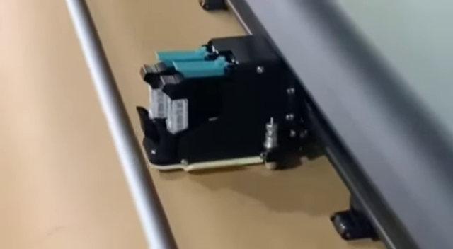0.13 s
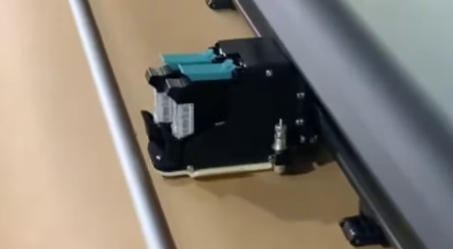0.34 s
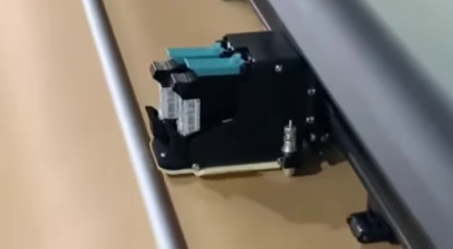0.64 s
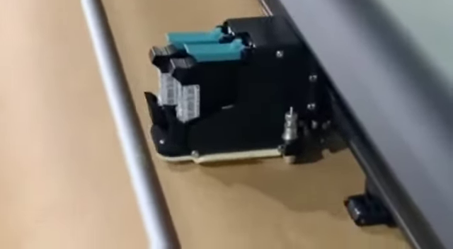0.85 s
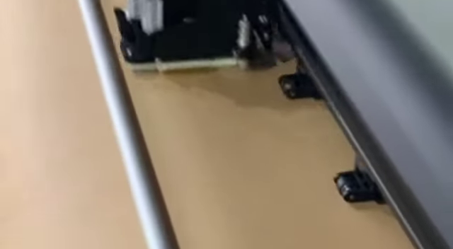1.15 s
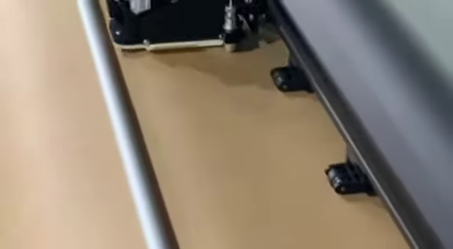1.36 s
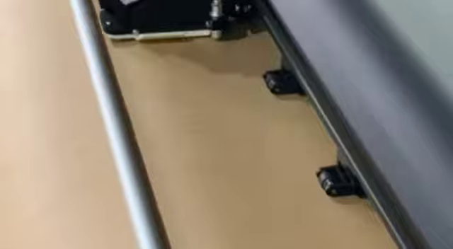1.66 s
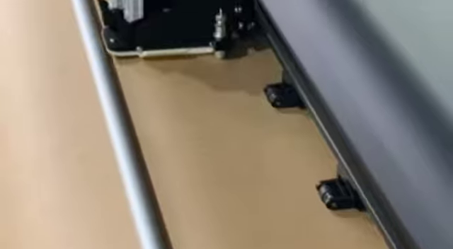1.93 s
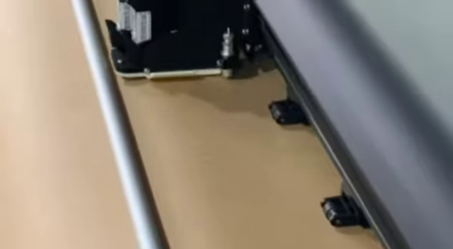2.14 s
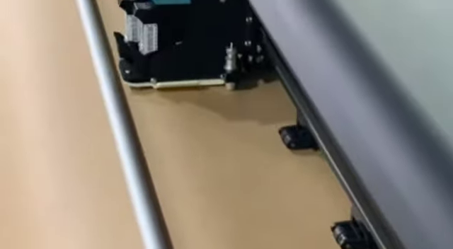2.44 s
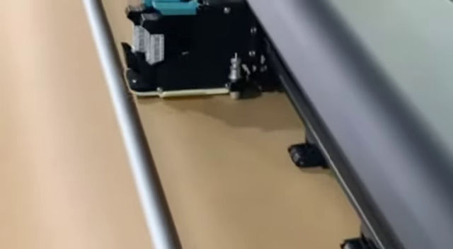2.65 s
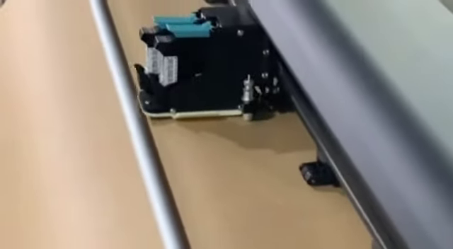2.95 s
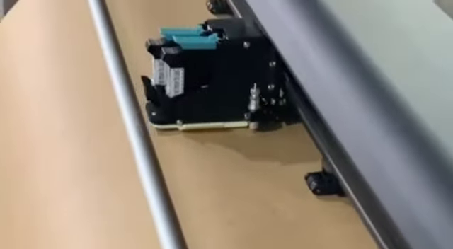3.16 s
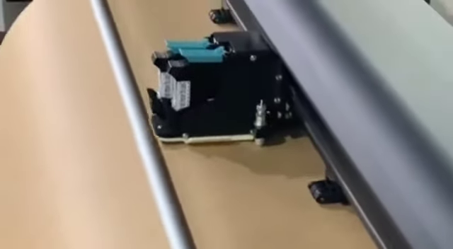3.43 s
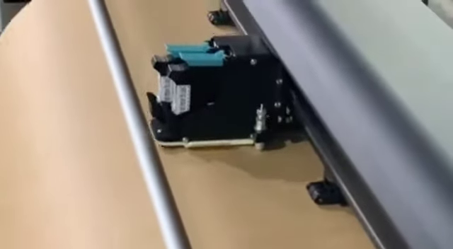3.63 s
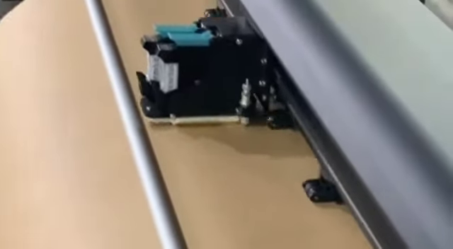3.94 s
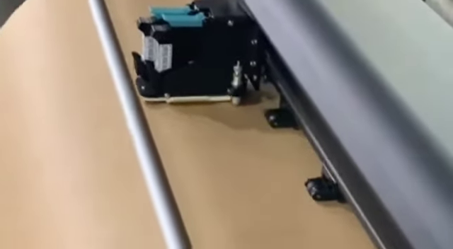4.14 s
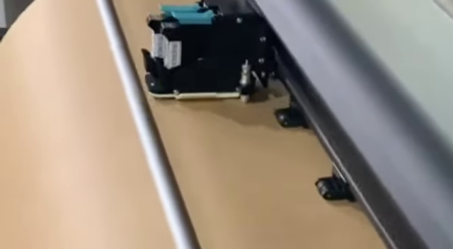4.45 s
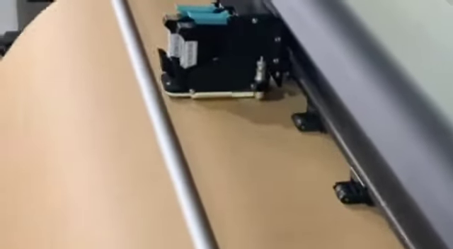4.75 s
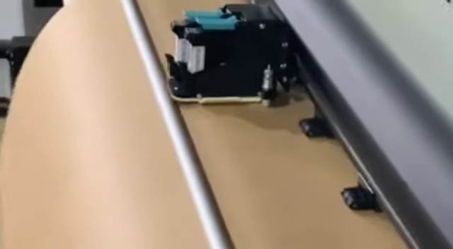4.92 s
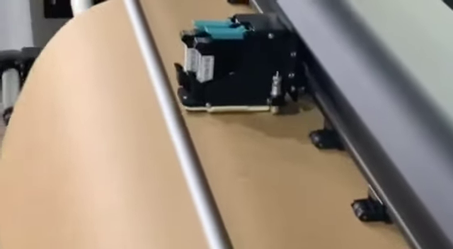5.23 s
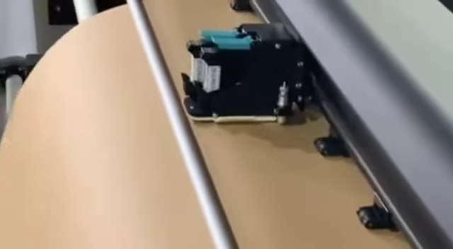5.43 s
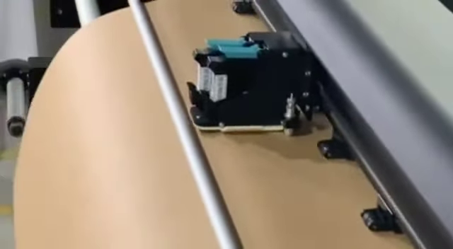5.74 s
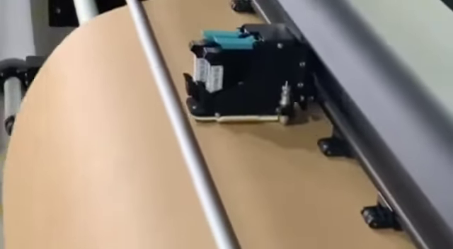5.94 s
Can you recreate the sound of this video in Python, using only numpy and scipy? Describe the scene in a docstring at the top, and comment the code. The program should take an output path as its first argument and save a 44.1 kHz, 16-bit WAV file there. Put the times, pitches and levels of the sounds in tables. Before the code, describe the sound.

Quick mechanical strokes: gears glide up to a nasal, singing pitch and fall again, with airy friction and rasping bearings. Some strokes are higher and faster, others low and nearly whineless. Paper rustles mostly to the left, the frame thuds dully, and tiny bright ticks and thin whistling mark the pen. Close stereo pickup, with room ring and a steady fan rumble behind.

```python
"""A gear whine arches up and down in pitch, close to the microphone: a large plotter at work in a workshop.
In each stroke the servo speeds up and brakes, and the carriage hisses, rumbles and clacks along its rail.
The sheet rustles, snaps and brushes the machine; the pen coil whistles faintly while the pen is down, and the
pen ticks. Behind them a low rumble swells, the frame thuds, and a suction fan hums in a rush of air."""
import sys
import numpy as np
from scipy import signal
from scipy.fft import rfft, irfft, next_fast_len
from scipy.io import wavfile
from scipy.ndimage import map_coordinates

SR = 44100
rng = np.random.default_rng(int(sys.argv[2]) if len(sys.argv) > 2 else 0)


def file_out(sig):
    """Save sig as 16-bit WAV at sys.argv[1]."""
    # one column per channel
    cols = np.atleast_2d(sig).T
    # limit, then scale
    lim = np.clip(cols, -1, 1)
    pcm = np.round(lim * 32767).astype(np.int16)
    wavfile.write(sys.argv[1], SR, pcm)


N = 268375
T = np.arange(N) / SR  # s

# Levels in the tables are in dB; most sources add a gain of their own.
# Carriage strokes, slow for detail, near 1000 Hz for long lines, fastest with the pen lifted:
# middle_s, length_s, top_mesh_pitch_hz, rolling_db, whine_db, hiss_db
CARRIAGE_STROKES = [(0.088, 0.25, 989.5, 2, -1.5, 0), (.397, 0.21, 1294, -2, -2, 0.7),
                    (0.756, 0.28, 1012, 2.5, -2, 0.5), (1.133, 0.29, 1415, 0.5, -2.5, 1),
                    (1.484, 0.19, 380, -3, -37, -3), (1.674, 0.18, 360, -4.5, -30, -3),
                    (1.993, 0.2, 470, -2, -34, -4), (2.241, 0.22, 509.6, -0.5, -7, -3.5),
                    (2.625, .24, 400, -8, -37, -4), (2.959, 0.25, 982.6, 2, -1.5, 0),
                    (3.269, .2, 1297, -2.5, -2.5, 0), (3.625, 0.25, 1024, 2, -4, -2),
                    (3.977, 0.25, 1000, 1, -1.5, -1), (4.373, 0.24, 984, 2, -2, 0.5),
                    (4.685, 0.21, 1298, 1, -2, 0), (5.043, 0.26, 1027, 2, -0.5, 0),
                    (5.354, 0.22, 1298, 1.5, -1.5, 0), (5.696, .21, 350.8, -0.5, -32, -3.5),
                    (5.954, 0.19, 842, 0, -2.5, 0)]
CRUISE = 1.02  # peak of the speed parabola, which is held at 1
LINE_HZ = 1000  # mesh pitch at carriage speed 1
GLIDE_SPREAD = 0.4  # half width of the carriage's noise, as a share of the stroke
# Gear partials; the weaker ones beside the mesh pitch come from the shaft's once-a-turn wobble:
# multiple_of_mesh_pitch, level_db
GEAR_PARTIALS = [(1, 0), (.78, -19), (.92, -15), (2, -17)]
# How well the housing radiates the whine: frequency_hz, gain_db
HOUSING_RESPONSE = [(200, -24), (450, -8), (620, -3), (720, -2), (800, 1.5), (870, -1), (950, 0),
                    (1020, -1.5), (1110, -4), (1250, -1), (1330, -2.5), (1450, -6), (2000, -3), (3000, -8)]
# Echoes of the whine off machine and walls: delay_s, gain_db
ECHO_PATHS = [(.013, -14), (.029, -13), (.056, -8.5), (.104, -10.5)]
# Panel modes that ring on when the whine lingers at their pitch: pitch_hz, gain_db, t60_s
PANEL_MODES = [(945, -2, .6), (1002, 5, 1.2), (1026, 7.5, 1.2), (1232, 0, .6), (1294, 0, .7)]
WHINE_DB, TORQUE_DB = -29, 5.5  # base level; lift towards the ends of a stroke
# Colour of the sliding hiss: frequency_hz, level_db
HISS_COLOUR = [(700, -15), (2500, -6), (5300, -4.5), (7000, -.5), (9000, 0), (12800, 0), (15500, -4.5)]
HISS_DB = 0.5
PORT_LAG_MS = 0.181  # delay of the left microphone port behind the right
# Colour of the rolling bearings: frequency_hz, level_db
ROLLING_COLOUR = [(200, -24), (430, 7.5), (800, -8), (1500, -2.5), (2100, -5), (3000, -4.5), (4300, -3.5),
                  (6000, -18.5), (12000, -71)]
# Resonances of the rail: pitch_hz, width_hz, level_db
RAIL_MODES = [(1990, 110, -21.5), (2410, 70, -28.5), (4440, 110, -34)]
# Rollers squeal or chirp on the rail: middle_s, length_s, pitch_hz, width_hz, level_db
ROLLER_SQUEALS = [(.07, 0.21, 2060, 260, -42.5), (.518, .024, 2700, 220, -41.5),
                  (0.74, 0.14, 2130, 200, -44), (.73, .1, 4270, 200, -48), (5.3, .05, 1590, 90, -42)]
# Clacks of the carriage along its rail, within and between strokes: time_s, level_db
CARRIAGE_CLACKS = [(.324, -3), (.376, 3.5), (.819, 2), (1.073, 4.5), (1.561, -2.5), (3.239, 2.5),
                   (3.488, -2.5), (5.838, 3.5)]
# Colour of a clack: frequency_hz, level_db
CLACK_COLOUR = [(300, 1), (800, 0.5), (1700, -8.5), (2700, -9.5), (4200, -10.0), (8000, -20)]
# Colour of the sheet's rustle: frequency_hz, level_db
RUSTLE_COLOUR = [(50, 5), (200, 15.0), (600, 10.0), (1200, 5.5), (2200, -2.0), (3200, -5.0),
                 (4300, -9.0), (5500, -47.0), (12000, -53)]
PAPER_DB, PAPER_SLOPE = -39.5, 0.85  # rustle at mean rumble level; dB per dB of rumble
# Snaps of the buckling sheet: time_s, level_db
SHEET_SNAPS = [(2.325, 7), (2.347, 8), (2.385, -10), (2.405, -5), (2.437, 5), (2.47, 1)]
# Colour of a snap: frequency_hz, level_db
SNAP_COLOUR = [(400, -4), (1000, -2), (1900, -2), (3000, -12), (4300, -12), (7000, -38)]
# Brushes of the paper's edge: middle_s, length_s, level_db
EDGE_BRUSHES = [(0.56, 0.21, -60), (1.305, 0.07, -58), (3.387, 0.075, -55.5), (4.51, 0.037, -59),
                (5.531, 0.16, -53.5)]
# Colour of the brushing: frequency_hz, level_db
BRUSH_COLOUR = [(1500, -32), (3300, 0), (4300, 10), (5000, 0), (5600, 2), (7200, 4), (9000, -30),
                (14000, -8)]
# Spells with the pen held down: start_s, end_s, whistle_db, left_over_right_db
PEN_SPELLS = [(.03, 0.25, -54.5, -18), (0.51, 0.943, -50.5, -10), (1.34, 1.56, -51.5, -9),
              (1.747, 2.12, -54, -4.5), (2.34, 2.78, -53.5, -6), (2.797, 3.147, -52.5, -7),
              (3.425, 3.804, -52, -11), (4.19, 4.55, -54, -3), (4.885, 5.231, -52, -11)]
COIL_HZ, COIL_FADE_S, COIL_WANDER_DB = 6000, 0.035, 1.2
# Pen ticks: time_s, level_db
PEN_TICKS = [(0.997, -62), (1.3578, -47), (1.7918, -44), (2.3815, -47), (2.5177, -48), (4.8419, -45),
             (4.9152, -49), (5.8396, -54)]
# Colour of a tick: frequency_hz, level_db
TICK_COLOUR = [(1500, -10), (5000, -47), (9000, 4.5), (15000, 8.5)]
# Thuds of the frame: time_s, level_db
FRAME_THUDS = [(0.268, -24.5), (0.919, -22.5), (1.559, -21.5), (2.126, -21.5), (2.405, -38), (3.242, -23.5),
               (4.795, -23.5), (5.331, -24.5)]
# Frame modes: pitch_hz, level_db, t60_s
FRAME_MODES = [(148, 16, 0.15), (218.6, -11, 0.44), (239, 15, 0.075), (284, 24.5, 0.039), (322, -8, 0.16),
               (630, 5, 0.021)]
# Level of the low rumble over time; the rustle rises and falls with it: time_s, level_db
RUMBLE_LEVEL = [(0.0, -26.5), (0.36, -24.5), (0.8, -26), (1.42, -27.5), (1.57, -25.0), (1.8, -29),
                (2.42, -26), (2.6, -30), (3.0, -28), (3.26, -24), (3.66, -27.5), (3.95, -25.5),
                (4.42, -28.5), (4.66, -24), (5.16, -28), (5.34, -23.5), (5.72, -30), (6.09, -26)]
# Colour of the low rumble: frequency_hz, level_db
RUMBLE_COLOUR = [(90, -30), (140, -1.5), (190, -3), (250, -0.5), (310, -6.5), (380, -14.5), (600, -24.5),
                 (1200, -49)]
# Borders of the rumble's registers: frequency_hz
RUMBLE_EDGES = [60, 140, 180, 220, 265, 320, 400, 1200]
RUMBLE_DB = -1.5
# Low swells in the rumble, each at its own pitch: middle_s, length_s, middle_pitch_hz, level_db
RUMBLE_SWELLS = [(0.42, 0.077, 245, -26.5), (0.551, 0.092, 194.3, -27), (0.644, 0.133, 246.7, -34),
                 (1.14, .1, 190.3, -29), (1.52, .1, 166, -31), (1.64, .06, 200, -29),
                 (1.912, 0.096, 161, -33), (2.272, 0.077, 190, -29.5), (2.314, 0.092, 212.3, -27.5),
                 (2.417, 0.081, 244.7, -27.5), (2.783, 0.18, 232, -30.5), (3.04, .1, 151.8, -30),
                 (3.124, 0.16, 240.2, -32), (3.279, .1, 196, -30), (3.405, 0.1, 185.8, -28.5),
                 (3.794, 0.097, 155, -29.5), (4.058, 0.1, 238.5, -29.5), (4.15, .1, 105.9, -26),
                 (4.541, 0.11, 199.3, -27.5), (4.668, 0.13, 180, -29.5), (5.373, 0.14, 214.2, -28)]
SWELL_DB, SWELL_GLIDE = 2.5, 0.06  # gain; fall from the middle pitch in one length, as a share of it
# Fan and mains tones: pitch_hz, level_db
FAN_TONES = [(38.8, -45.5), (50, -49), (77.6, -27), (116.4, -38), (155.2, -42), (194, -40.5), (300, -40.5)]
FAN_WAVER_DB = 0.8
# Colour of the fan's air: frequency_hz, level_db
AIR_COLOUR = [(20, -42), (26, -22), (31, 4), (38, -1), (55, 11), (72, 3.5), (100, 6.5), (125, -11),
              (300, -9), (600, -14.5), (1200, -18), (2000, -23), (4300, -36.5), (6000, -32.5),
              (14000, -107)]
TOP_HZ = 15600  # upper limit of the recorder


def undb(db):
    """Decibels to gain."""
    return 10 ** (np.asarray(db) / 20)


def unit(x):
    """Scale to rms 1."""
    return x / np.sqrt(np.mean(x ** 2))


def curve(rows):
    """Join (time, value) rows by straight lines."""
    return np.interp(T, *np.transpose(rows))


def swell(middle, length):
    """A bell-shaped bump in time, top 1, down to 1/e at half a length from the middle."""
    return np.exp(-np.minimum((2 * (T - middle) / length) ** 2, 60))


def walk(rate):
    """Random drift of rms 1 through about `rate` new values a second."""
    knots = rng.standard_normal(N // 20)
    return unit(np.interp(T * rate, np.arange(len(knots)), knots))


def band_pass(x, low_hz, high_hz):
    """Keep one band of frequencies."""
    return signal.sosfilt(signal.butter(2, [low_hz, high_hz], "band", fs=SR, output="sos"), x)


def colour(x, points):
    """Filter by a spectrum of (frequency, level) points, joined on a log frequency axis."""
    hz, db = np.transpose(points)
    size = next_fast_len(N + 8192)
    f = np.maximum(np.fft.rfftfreq(size, 1 / SR), 1)
    gain = undb(np.interp(np.log(f), np.log(hz), db))
    return irfft(rfft(x, size) * gain, size)[..., :N]


def bursts(rows, decay_s, points):
    """Repeat one coloured, decaying noise burst at each (time, level) row."""
    hits = np.zeros(N)
    for s, db in rows:
        hits[int(s * SR)] += undb(db)
    t = T[:SR // 10]
    burst = rng.standard_normal(len(t)) * np.exp(-t / decay_s)
    return colour(signal.fftconvolve(hits, burst)[:N], points)


def diffuse(points, split_hz):
    """Coloured noise at two ports: alike in the bass, unrelated above split_hz."""
    mid, side = rng.standard_normal((2, N))
    side = signal.sosfilt(signal.butter(2, split_hz, "high", fs=SR, output="sos"), side)
    return unit(colour(np.array([mid + side, mid - side]), points))


def place(x, left_db, left_lag_ms=0):
    """Give a sound its balance and its delay between the two microphone ports."""
    left, right = np.broadcast_to(x, (2, N))
    left = map_coordinates(left, [np.arange(N) - left_lag_ms * SR / 1000], order=5)
    return np.array([left * undb(left_db / 2), right * undb(-left_db / 2)])


def workshop(x, t60, treble_t60):
    """Diffuse room tail of decaying noise, with its own decay time in the treble (s)."""
    t = T[:SR]
    noise = rng.standard_normal((2, SR))
    low = signal.sosfilt(signal.butter(2, 2500, fs=SR, output="sos"), noise)
    low_tail = low * np.exp(-np.log(1000) * t / t60)
    treble_tail = (noise - low) * np.exp(-np.log(1000) * t / treble_t60)
    onset = np.clip(t / 0.00016, 0, 1)
    tail = (low_tail + treble_tail) * onset / np.sqrt(SR * t60 / np.log(1e6))
    return signal.fftconvolve(x[None], tail, axes=1)[:, :N]


def motion():
    """Motor speed is a flat-topped parabola in each stroke; the carriage's noise swells more softly around it."""
    pitch, whine, speed, hiss, roll = np.zeros((5, N))
    for middle, length, top_hz, roll_db, whine_db, hiss_db in CARRIAGE_STROKES:
        along = 2 * (T - middle) / length  # -1 to 1 through the stroke
        now = np.abs(along) < 1
        arch = np.minimum(CRUISE * (1 - along[now] ** 2), 1)
        pitch[now] = top_hz * arch
        whine[now] = np.sqrt(arch) * undb(whine_db + TORQUE_DB * np.abs(along[now]))
        glide = top_hz / LINE_HZ * swell(middle, 2 * GLIDE_SPREAD * length)
        now = glide > speed  # where strokes overlap, the faster one counts
        speed[now], hiss[now], roll[now] = glide[now], undb(hiss_db), undb(roll_db)
    return pitch, whine, speed, hiss * undb(HISS_DB), roll


def gear_whine(pitch, gain):
    """Meshing teeth sing a rough tone with partials beside it; echoes, panels and room follow it."""
    phase = 2 * np.pi * np.cumsum(pitch * (1 + 0.005 * walk(220))) / SR
    teeth = 0
    for multiple, db in GEAR_PARTIALS:
        teeth = teeth + undb(db) * np.sin(multiple * phase) * (1 + 0.3 * walk(130))
    tone = undb(WHINE_DB) * colour(teeth * gain, HOUSING_RESPONSE)
    # the nearest path swells and fades at random
    direct = place(tone * undb(-0.5 + 2 * np.tanh(walk(60))), left_db=11, left_lag_ms=-0.1)
    echoes = np.zeros((2, N))
    for delay_s, db in ECHO_PATHS:
        for port in range(2):
            port_delay_s = delay_s * rng.uniform(0.9, 1.1)
            echoes[port] += undb(db) * np.interp(T - port_delay_s, T, tone, left=0)
    room = undb(2) * workshop(tone, t60=0.95, treble_t60=0.6)
    return direct + place(echoes + room + panels(tone), left_db=4.5)


def panels(x):
    """Panels ring as sharp resonances, each with its own gain at its pitch."""
    t, ring = T[:SR], 0
    for hz, db, t60 in PANEL_MODES:
        decay = np.log(1000) / t60
        level = undb(db) * 2 * decay / SR  # brings the gain at the mode's pitch to db
        ring = ring + level * np.sin(2 * np.pi * hz * t) * np.exp(-decay * t)
    return signal.fftconvolve(x, ring)[:N]


def sliding(speed, gain):
    """Fine friction grains hiss with speed and reach the right port first."""
    grains = rng.standard_normal(N) * undb(2.0 * walk(2500) + 0.5 * walk(60))
    hiss = unit(colour(grains, HISS_COLOUR)) * gain * speed ** 1.05
    direct = undb(-30) * place(hiss, left_db=0, left_lag_ms=PORT_LAG_MS)
    return direct + undb(-44) * workshop(hiss, t60=0.7, treble_t60=0.6)


def bearings(speed, gain):
    """Rollers and belt make a duller, rasping rush that rings the rail and fills the room."""
    rasp = rng.standard_normal(N) * undb(2.6 * walk(260) + 1.5 * np.tanh(walk(60)))
    rush = unit(colour(rasp, ROLLING_COLOUR))
    for hz, width_hz, db in RAIL_MODES:
        ring = signal.lfilter(*signal.iirpeak(hz, hz / width_hz, fs=SR), rasp)
        rush = rush + unit(ring) * undb(db + 3 * walk(5))
    rush = rush * gain * speed ** 0.64
    direct = undb(-37.0) * place(rush, left_db=1.5, left_lag_ms=-0.076)
    room = workshop(rush, t60=0.94, treble_t60=0.81)
    return direct + undb(-37.5) * place(room, left_db=-2.5)


def squeals():
    """A roller rubs the rail into a short, narrow band of sound."""
    out = np.zeros(N)
    for middle, length, hz, width_hz, db in ROLLER_SQUEALS:
        ring = band_pass(rng.standard_normal(N), hz - width_hz / 2, hz + width_hz / 2)
        out += undb(db) * swell(middle, length) * unit(ring)
    room = workshop(out, t60=0.5, treble_t60=0.35)
    return undb(1.5) * place(out, left_db=8) + undb(-1) * room


def clacks(decay_s):
    """Slack in the carriage is taken up with a short clatter."""
    clack = bursts(CARRIAGE_CLACKS, decay_s, CLACK_COLOUR)
    room = undb(14.5) * workshop(clack, t60=0.87, treble_t60=0.37)
    return undb(-24.5) * (place(clack, left_db=5) + room)


def paper(rumble_db):
    """The moving sheet rustles in uneven crinkles, rising and falling with the level of the low rumble."""
    grains = rng.standard_normal(N) * undb(3.5 * np.tanh(walk(45)) + 2.4 * walk(500))
    rustle = unit(colour(grains, RUSTLE_COLOUR))
    rustle = rustle * undb(PAPER_DB + PAPER_SLOPE * (rumble_db - rumble_db.mean()))
    return undb(-4.5) * place(rustle, left_db=23.0) + workshop(rustle, t60=0.24, treble_t60=0.4)


def crinkles(decay_s):
    """The sheet buckles in a quick run of small snaps."""
    snap = bursts(SHEET_SNAPS, decay_s, SNAP_COLOUR)
    room = undb(9.5) * workshop(snap, t60=0.34, treble_t60=0.25)
    return undb(-33.5) * (place(snap, left_db=6) + room)


def brushes():
    """The paper's edge brushes along the machine on the left with a bright, grainy scrape."""
    grains = rng.standard_normal(N) * undb(2.5 * walk(90) + 2 * walk(900))
    strokes = sum(undb(db) * swell(middle, length) for middle, length, db in EDGE_BRUSHES)
    scrape = unit(colour(grains, BRUSH_COLOUR)) * strokes
    room = undb(16.5) * workshop(scrape, t60=0.27, treble_t60=0.23)
    return place(scrape, left_db=9, left_lag_ms=0.13) + room


def pen_coil():
    """The coil's switching tone sounds while the pen is down; it flutters, and wanders in level at each port."""
    tone = np.sqrt(2) * np.sin(2 * np.pi * COIL_HZ * T + 0.5 * walk(55)) * (1 + 0.16 * walk(80))
    held = np.zeros((2, N))
    for start, end, db, left_db in PEN_SPELLS:
        gate = np.clip(np.minimum(T - start, end - T) / COIL_FADE_S, 0, 1)
        held += gate * undb([[db + left_db / 2], [db - left_db / 2]])
    wander = undb(COIL_WANDER_DB * np.array([walk(19.8), walk(5.94)]))
    return tone * held * wander


def pen(decay_s):
    """The pen holder lands with a tiny bright tick."""
    tick = bursts(PEN_TICKS, decay_s, TICK_COLOUR)
    return undb(6.5) * place(tick, left_db=-1, left_lag_ms=PORT_LAG_MS)


def frame(rumble_db):
    """Low noise rumbles, wandering from one register to another; jolts ring the frame's low modes."""
    t = T[:SR // 2]
    ring = 0
    for hz, db, t60 in FRAME_MODES:
        ring = ring + undb(db) * np.sin(2 * np.pi * hz * t) * np.exp(-np.log(1000) * t / t60)
    hits = np.zeros(N)
    for s, db in FRAME_THUDS:
        hits[int(s * SR)] += undb(db)
    thuds = undb(-14.0) * signal.fftconvolve(hits, ring * np.clip(t / 0.0024, 0, 1))[:N]
    noise = diffuse(RUMBLE_COLOUR, split_hz=940)
    lumps = 0
    for k, (low_hz, high_hz) in enumerate(zip(RUMBLE_EDGES, RUMBLE_EDGES[1:])):
        shifted = np.roll(noise, k * SR // 2, axis=1)  # another stretch of noise for each register
        lumps = lumps + band_pass(shifted, low_hz, high_hz) * undb(2.2 * walk(14))
    rumble = unit(lumps) * undb(rumble_db + RUMBLE_DB)
    return place(rumble + thuds, left_db=-0.6, left_lag_ms=-0.018)


def rumble_swells():
    """Low swells in the rumble are slightly rough tones, each at its own pitch, gliding slightly down."""
    out = np.zeros(N)
    rough = undb(2 * walk(50))
    for middle, length, hz, db in RUMBLE_SWELLS:
        pitch = hz * (1 - SWELL_GLIDE * np.clip((T - middle) / length, -1, 1))
        cycles = np.cumsum(pitch) / SR + rng.uniform()
        out += undb(db) * swell(middle, length) * np.sin(2 * np.pi * cycles)
    return place(out * rough * undb(SWELL_DB), left_db=1.0)


def fan():
    """Shaft harmonics and mains tones waver a little over the rush of air."""
    hum = 0
    for hz, db in FAN_TONES:
        level = np.sqrt(2) * undb(db + FAN_WAVER_DB * walk(4.55))
        phase = 2 * np.pi * hz * T + 0.51 * walk(3.95) + rng.uniform(0, 2 * np.pi)
        hum = hum + level * np.sin(phase)
    air = diffuse(AIR_COLOUR, split_hz=240) * undb(-29.5 + 0.56 * walk(4.27))
    return place(hum, left_db=2.2) + place(air, left_db=1.3, left_lag_ms=-0.05)


def suction():
    """Air drawn past the edge of the paper leaves a faint steady hiss."""
    hiss = unit(colour(rng.standard_normal(N), HISS_COLOUR))
    return undb(-51) * place(hiss, left_db=0, left_lag_ms=PORT_LAG_MS)


def scene():
    """Carriage motion drives whine, hiss and rolling; rumble and rustle share one level course; the fan runs on."""
    pitch, whine_gain, speed, slide_gain, roll_gain = motion()
    rumble_db = curve(RUMBLE_LEVEL)
    carriage = gear_whine(pitch, whine_gain) + sliding(speed, slide_gain) + bearings(speed, roll_gain)
    carriage = carriage + squeals() + clacks(decay_s=0.008)
    sheet = paper(rumble_db) + crinkles(decay_s=0.0065) + brushes()
    pen_sounds = pen_coil() + pen(decay_s=0.011)
    background = frame(rumble_db) + rumble_swells() + fan() + suction()
    return carriage + sheet + pen_sounds + background


def record(dry):
    """The recorder cuts the top with a steep low-pass."""
    return signal.sosfilt(signal.ellip(10, 0.2, 80, TOP_HZ, fs=SR, output="sos"), dry)


dry = scene()
out = record(dry)
file_out(out)
```